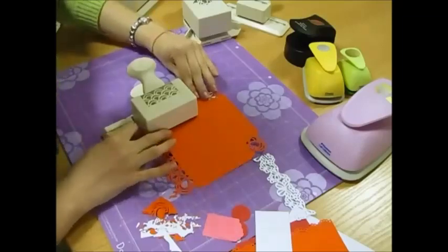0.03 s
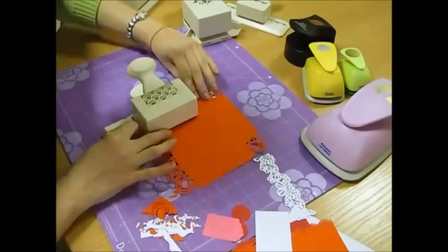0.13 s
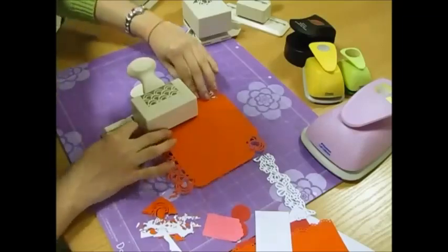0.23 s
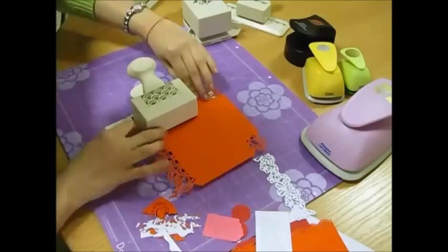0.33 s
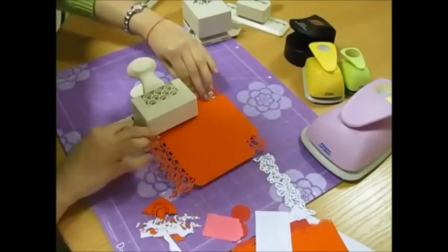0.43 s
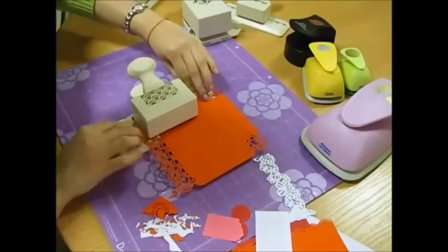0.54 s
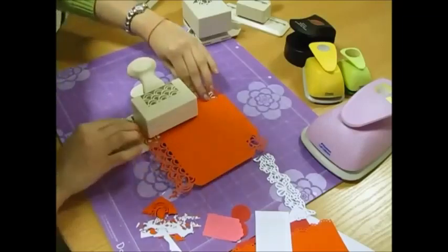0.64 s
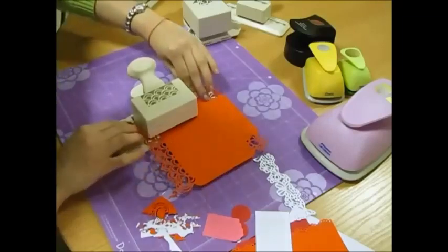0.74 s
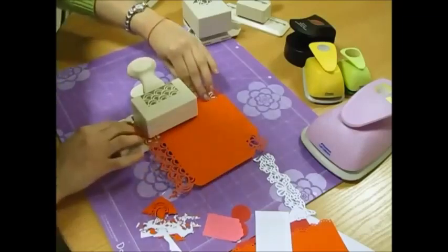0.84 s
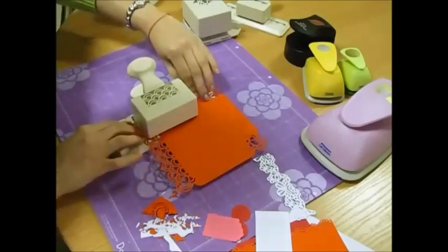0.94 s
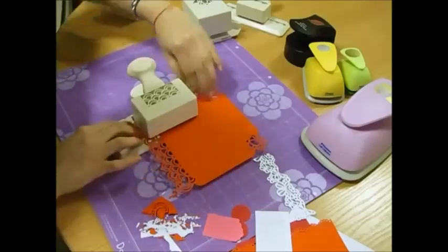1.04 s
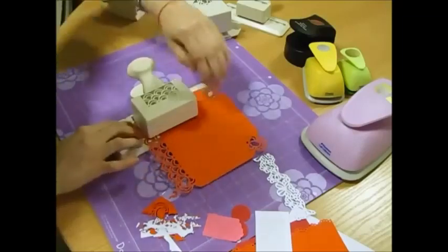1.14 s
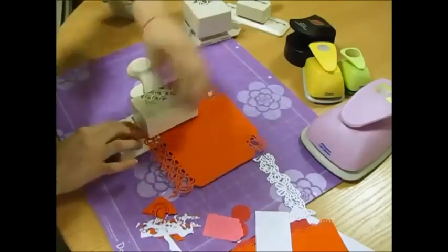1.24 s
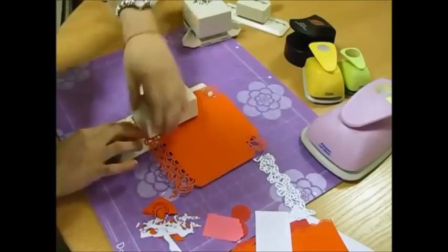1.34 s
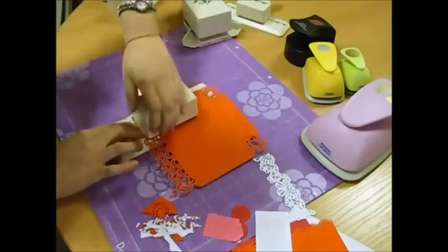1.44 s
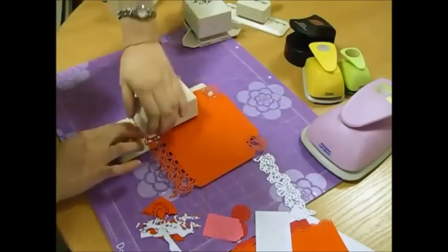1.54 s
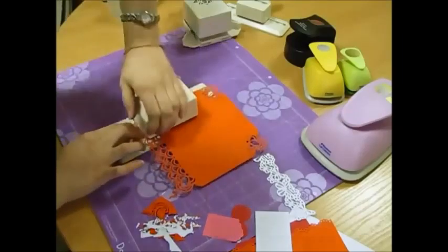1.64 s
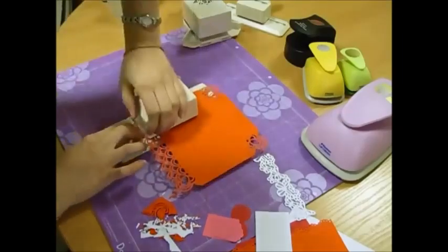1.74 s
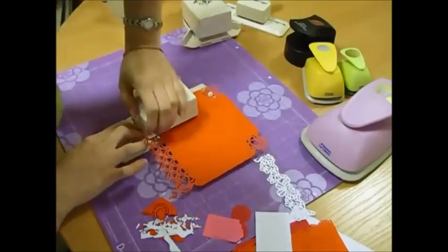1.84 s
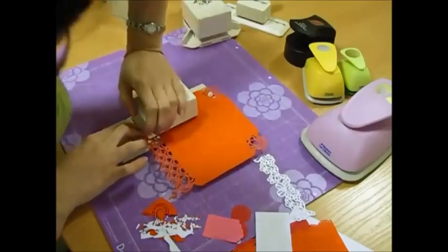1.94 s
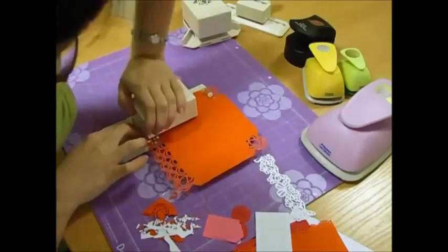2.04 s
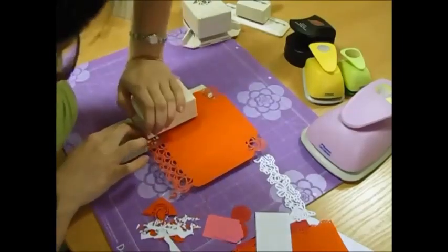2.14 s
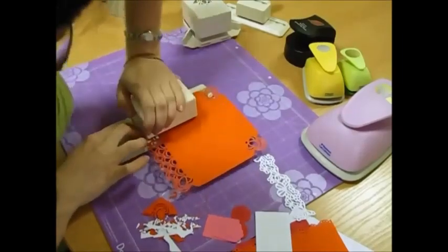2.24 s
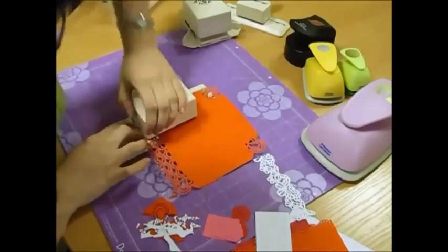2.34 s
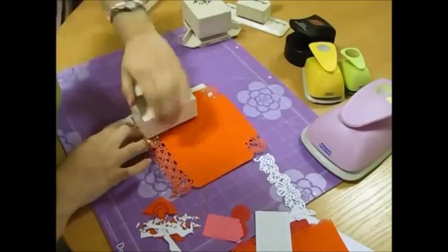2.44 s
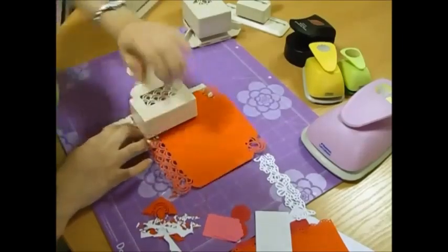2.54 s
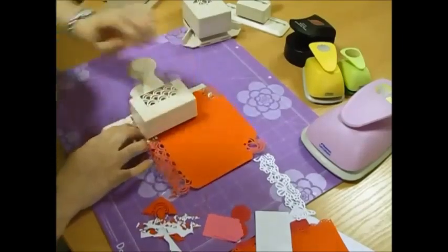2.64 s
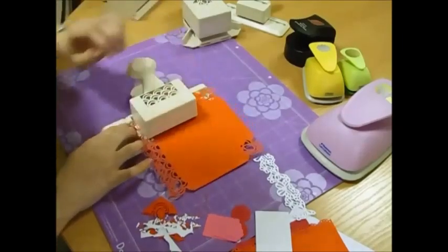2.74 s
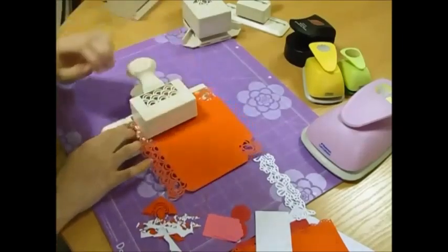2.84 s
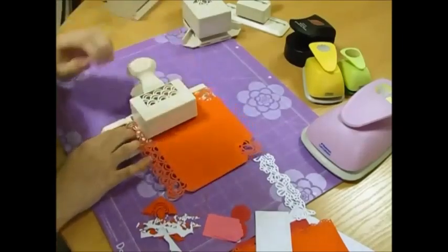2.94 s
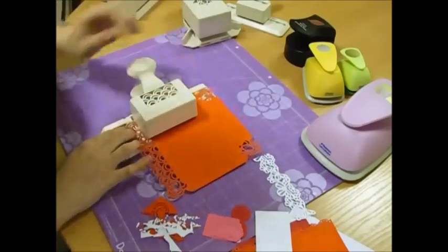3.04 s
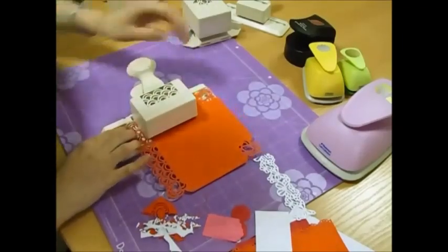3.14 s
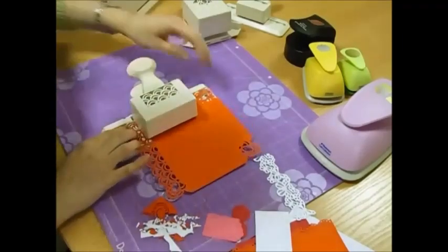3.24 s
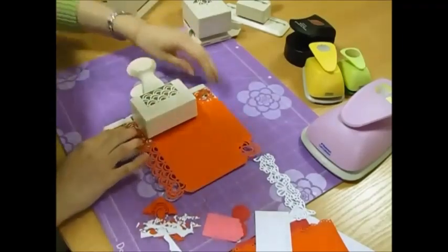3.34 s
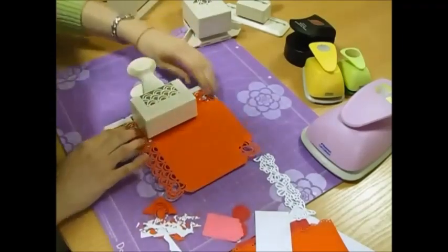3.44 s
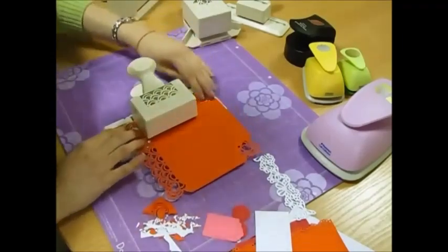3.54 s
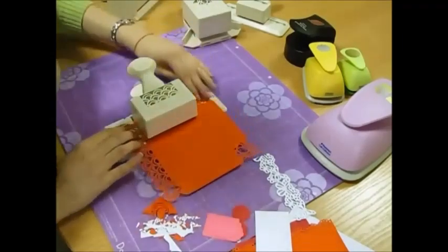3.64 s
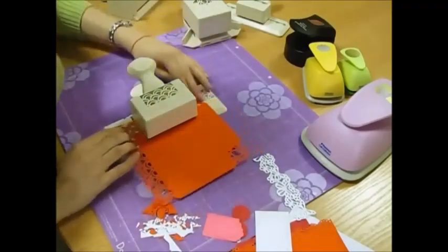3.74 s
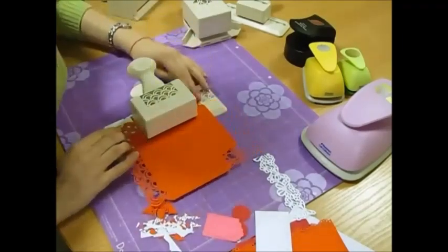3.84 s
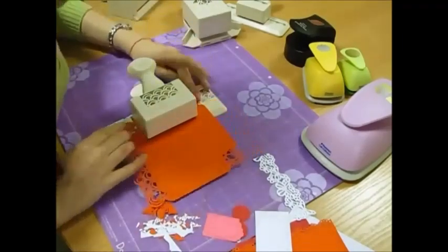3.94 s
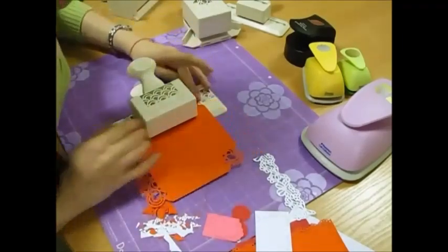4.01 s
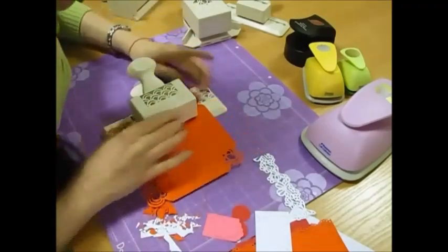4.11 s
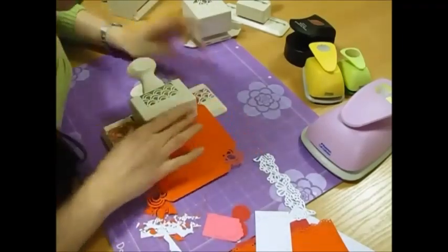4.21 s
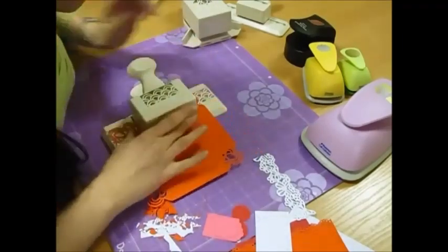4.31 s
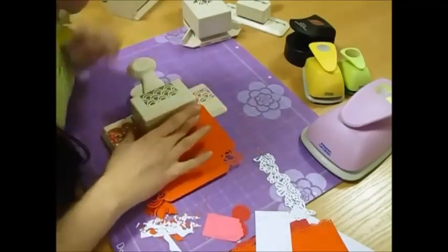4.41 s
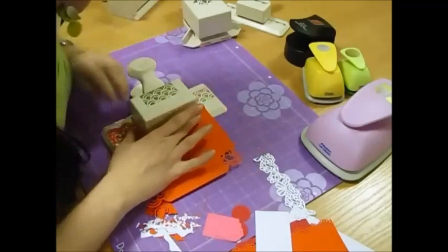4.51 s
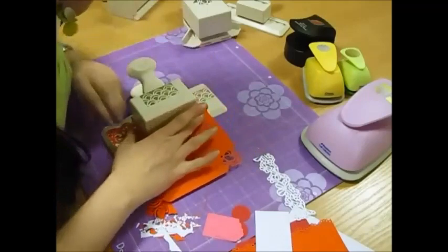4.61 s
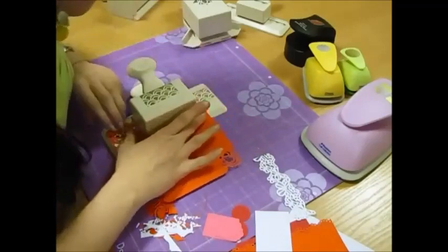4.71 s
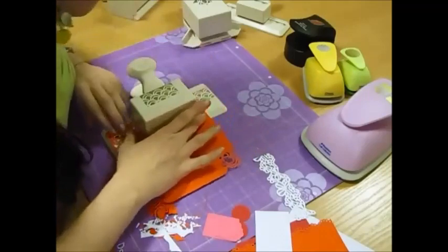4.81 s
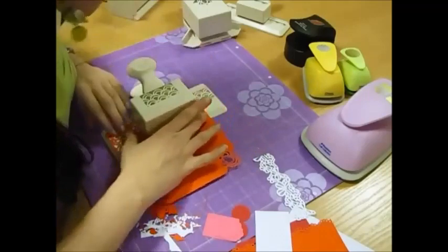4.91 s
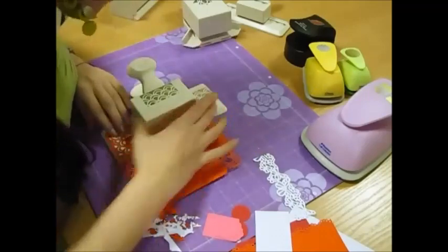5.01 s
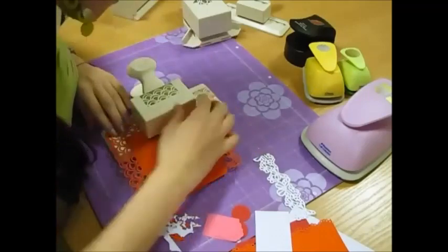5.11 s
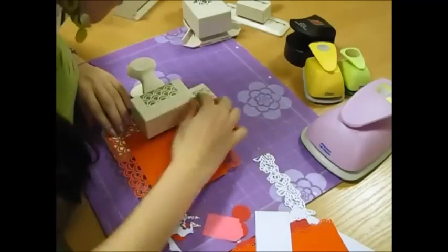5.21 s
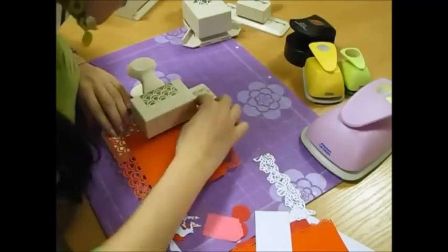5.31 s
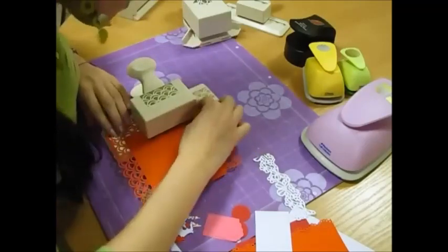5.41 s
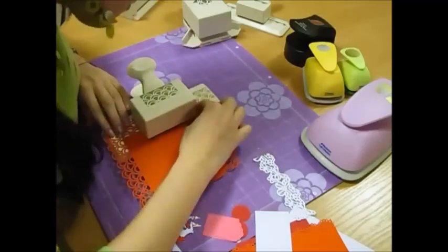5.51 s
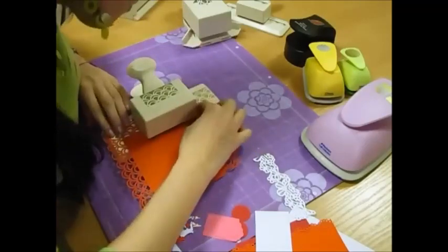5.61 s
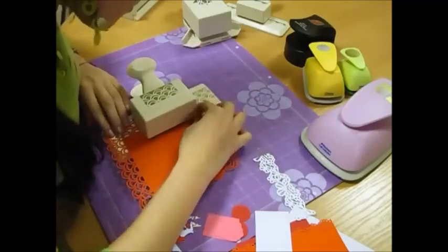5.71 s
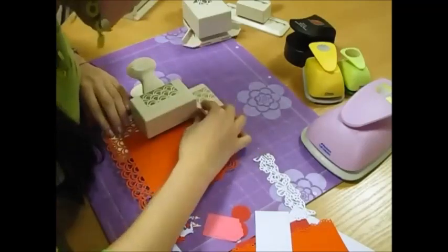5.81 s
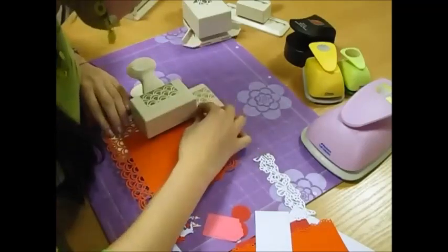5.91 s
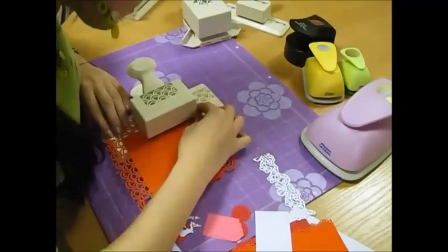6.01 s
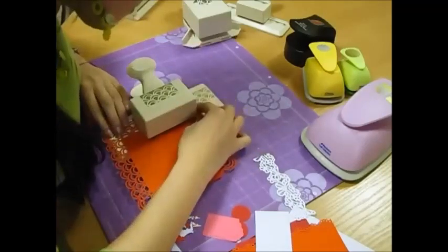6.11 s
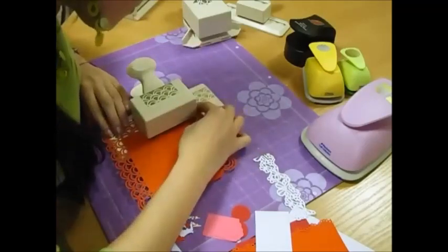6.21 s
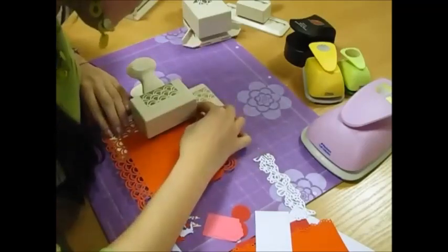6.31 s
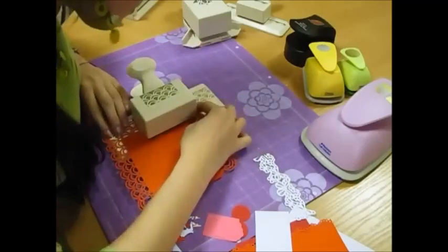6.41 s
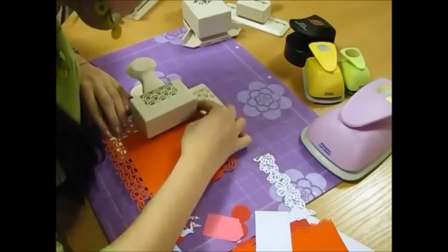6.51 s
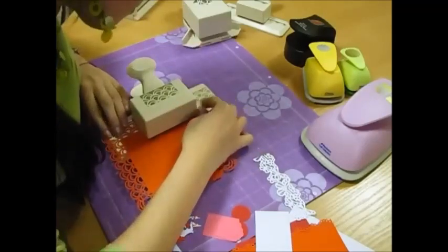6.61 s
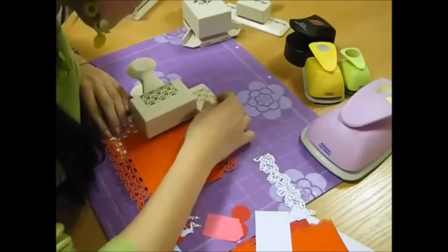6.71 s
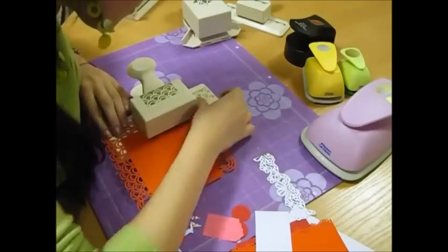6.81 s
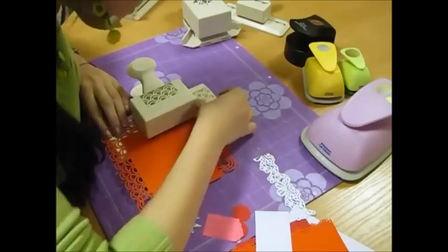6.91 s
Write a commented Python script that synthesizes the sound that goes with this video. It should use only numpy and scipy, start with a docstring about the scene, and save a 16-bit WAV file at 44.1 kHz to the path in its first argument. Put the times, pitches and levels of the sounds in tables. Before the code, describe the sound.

In a small rumbling room, a lever punch bites through card with one dense crunch, followed by a handle clack, papery slides and light clicks.

```python
"""A lever paper punch is pressed through card on a table, in a small room with a low rumble. Fracture bursts
and damped modes make the die break through in separate snaps, then in one dense crunch; noise grains scrape it
back up, the latch clicks as the die frees, and the handle rings as it knocks home twice. Before, but mostly
afterwards, the card is slid along the mat, patted and lined up: grains of friction noise, with small ticks of
fingers and card on the plastic as short clicks and rings."""
import sys
import numpy as np
from scipy import signal
from scipy.fft import rfft, irfft, next_fast_len
from scipy.io import wavfile
from scipy.ndimage import uniform_filter1d

SR = 44100
rng = np.random.default_rng(int(sys.argv[2]) if len(sys.argv) > 2 else 0)


def wrap_up_sound(samples):
    """Save the sound to the file named by the first command line argument, as 16-bit audio."""
    columns = np.atleast_2d(samples).T
    # keep every value between -1 and 1, then stretch to whole-number steps
    tamed = np.clip(columns, -1, 1)
    steps = np.round(tamed * 32767).astype(np.int16)
    wavfile.write(sys.argv[1], SR, steps)


N = 306495
T = np.arange(N) / SR
RING_T = T[:SR // 2]

# the die breaks through, levels before the trims of each layer: (time [s], crack [dB], treble of the crack [dB],
# thud of the base [dB], knock of the shell [dB], ring of the die [Hz], its upper ring [dB])
DIE_SNAPS = [(1.5619, -39.5, -80, -32, -35.5, 2220, -63.5), (1.7082, -51, -65, -31.5, -34.5, 2170, -59),
             (1.7487, -32, -40, -20.5, -32, 2130, -54), (1.793, -26, -38.5, -12, -17, 2480, -29.5),
             (1.834, -18.5, -24, -24.5, -22.5, 2070, -36), (1.8932, -16, -23, -10.5, -12.5, 2230, -30.5),
             (1.965, -23, -32.5, -18.5, -17.5, 2090, -36.5), (2.0035, -29.5, -27, -24, -15.5, 2550, -29),
             (2.0116, -14.5, -20.5, -11, -4, 2400, -25), (2.0227, -15.5, -32, -19.5, -24.5, 2360, -20.5),
             (2.0296, -13.5, -16.5, -15.5, -12.5, 2500, -9.5), (2.0356, -11, -24, -16, -10.5, 2155, -24),
             (2.0531, -17, -30, -23, -13, 2270, -25), (2.0868, -27, -34, -31, -29, 2620, -22),
             (2.098, -12, -40, -16.5, -45, 2510, -22), (2.1223, -22, -37, -46, -50, 2830, -29)]
# modes of the punch's base, before each blow's change of pitch: (frequency [Hz], relative level [dB], t60 [s])
BASE_MODES = [(78, -12, 0.073), (108, -6, 0.045), (285, 0, 0.045), (342, 2, 0.035), (390, 5, 0.026),
              (558.4, -19, 0.24)]
# modes of the cutting edges, before any change of pitch: (frequency [Hz], relative level [dB], t60 [s])
BLADE_MODES = [(5800, 4.5, 0.011), (6600, 1.5, 0.0087), (7760, -8, 0.018), (8480, 2.5, 0.0087)]
# modes of the hollow plastic body around the slot: (frequency [Hz], relative level [dB], t60 [s])
PLASTIC_MODES = [(1180, -3, .035), (1530, -8, .04), (2080, 0, .028), (2510, -3, .028), (3100, -1, .022),
                 (3560, -4, .018), (4230, -1, .02), (5600, -6, .016), (6400, -7, .016), (7000, -8, .016)]
# spectrum of breaking card: (frequency [Hz], level [dB])
CRACK_SPECTRUM = [(400, -3.5), (850, 0), (1020, -1.5), (1200, 0.5), (1800, -5), (2400, -0.5), (3200, -8.5),
                  (4000, -4), (4900, -12), (8600, -12), (10500, -16.5), (15000, -22)]
# spectrum of a light click: (frequency [Hz], level [dB])
TICK_SPECTRUM = [(300, 2), (800, 7.5), (1250, 10), (2600, 4.5), (3700, 7), (5000, 0.5), (7500, -19),
                 (15000, -20)]
# spectrum of the card's friction hiss: (frequency [Hz], level [dB])
CARD_SPECTRUM = [(590, -38), (1000, -13), (1700, -3), (2400, -0.5), (4240, -2.5), (7360, -11),
                 (8840, -15.5), (14300, -24.5), (15500, -43)]
# stereo width of sounds on the table: (frequency [Hz], side minus mid [dB])
NEAR_WIDTH = [(60, -51), (400, -15.5), (2000, -10), (4000, -8), (15000, -5)]
# the die rises through the cut card
LIFT_S, LIFT_ATTACK_S, LIFT_HOLD_S, LIFT_RELEASE_S = 2.335, 0.09, 0.067, 0.0046


def amp(db):
    """Decibels to an amplitude ratio."""
    return 10 ** (np.asarray(db) / 20)


def unit(x):
    """Normalization to an rms of 1."""
    return x / np.sqrt(np.mean(x ** 2) + 1e-20)


def read(points, hz):
    """Interpolation of a spectrum along logarithmic frequency."""
    f, value = np.transpose(points)
    return np.interp(np.log(hz + 1), np.log(f + 1), value)


def add(mix, s, sound):
    """Superposition: a sound is added in place from time s."""
    part = mix[..., round(s * SR):][..., :sound.shape[-1]]
    part += sound[..., :part.shape[-1]]


def convolve(x, response):
    """Linear filtering of each channel by an impulse response, keeping the length."""
    return signal.fftconvolve(np.atleast_2d(x), np.atleast_2d(response), axes=1)[:, :x.shape[-1]]


def colour(x, points, size=2048):
    """Minimum-phase filtering: the Hilbert transform of the log gain gives a causal phase."""
    hz = abs(np.fft.fftfreq(size, 1 / SR))
    log_gain = np.log(amp(np.maximum(read(points, hz), -90)))
    response = np.fft.ifft(np.exp(np.conj(signal.hilbert(log_gain)))).real
    return convolve(x, response)


def passed(x, points):
    """Spectral shaping that keeps the power of a white drive."""
    gains = amp(read(points, np.linspace(0, SR / 2, SR // 10)))
    return colour(x, points) / np.sqrt(np.mean(gains ** 2))


def ring(modes, pitch=1, rise_s=0.0022):
    """Modal decay: damped sines of a struck body, neighbours in opposite phase, with a joint peak of 1."""
    wave = np.zeros(len(RING_T))
    for k, (hz, db, t60) in enumerate(modes):
        decay = amp(db - 60 * RING_T / t60)
        wave += (-1) ** k * decay * np.sin(2 * np.pi * hz * pitch * RING_T)
    wave = wave * (1 - np.exp(-RING_T / rise_s))
    return wave / abs(wave).max()


def struck(x, modes):
    """Modal resonance by convolution, keeping the power of a white drive."""
    wave = ring(modes)
    return convolve(x, wave / np.linalg.norm(wave))


def resonate(x, hz, width):
    """Heterodyne resonance of gain 1: shift the moving centre to zero, low-pass, shift back."""
    turn = np.exp(2j * np.pi * np.cumsum(hz) / SR)
    r = np.exp(-np.pi * width / SR)
    lowered = signal.lfilter([1 - r], [1, -r], x / turn + 1e-18)
    return 2 * (turn * lowered).real


def ports(pair, side_db=NEAR_WIDTH):
    """Spatial coherence: mid and side noise give two microphones a frequency-dependent likeness."""
    share = amp(read(side_db, np.fft.rfftfreq(pair.shape[1], 1 / SR)))
    mid, side = rfft(pair)
    left_right = np.array([mid + share * side, mid - share * side]) / np.hypot(1, share)
    return irfft(left_right, pair.shape[1])


def noise(side_db=NEAR_WIDTH):
    """White noise with partial coherence between two microphones."""
    return ports(rng.standard_normal((2, next_fast_len(N))), side_db)[:, :N]


def grains(per_s, spread_db, grain_s=0.0002):
    """Stick-slip friction: random slips of uneven size, each a decaying puff of noise."""
    happens = rng.random
    size = amp(spread_db * np.minimum(rng.exponential(1, N), 3.5)) * (happens(N) < per_s / SR)
    power = signal.lfilter([1], [1, -np.exp(-2 / (grain_s * SR))], size ** 2 + 1e-20)
    return unit(ports(rng.standard_normal((2, N)) * np.sqrt(power)))


def burst(points, decay_s, edges=(6000,), size=2048):
    """Brittle fracture: swelling and dying noise, split into bands with a smoothed peak of 1 each."""
    age = T[:size] / decay_s
    spectra = rfft(rng.standard_normal((2, size)) * age * np.exp(-age))
    evened = irfft(spectra / (abs(spectra) + 1e-9) ** (2 / 3))  # flattens the chance peaks of the spectrum
    crack = colour(ports(evened), points)
    bands = []
    for limits in zip((100, *edges), (*edges, 18000)):
        band = signal.sosfilt(signal.butter(4, limits, "band", fs=SR, output="sos"), crack)
        peak_power = uniform_filter1d(band.mean(0) ** 2, size=88).max()
        bands.append(band / np.sqrt(peak_power))
    return bands


def envelope(s, attack_s, hold_s, release_s, power=1.14):
    """Amplitude envelope: attack, hold and release from time s, bent by a power."""
    return np.interp(T, s + np.cumsum([0, attack_s, hold_s, release_s]), [0, 1, 1, 0]) ** power


def lingering(times, dbs, decay_s):
    """Relaxation: energy arrives at each of the times and decays exponentially."""
    kicks = np.zeros(N)
    kicks[np.round(times * SR).astype(int)] = amp(dbs) ** 2
    return np.sqrt(signal.lfilter([1], [1, -np.exp(-2 / (decay_s * SR))], kicks + 1e-20))


def wander(rate_hz):
    """Low-pass random fluctuation with an rms of 1."""
    return unit(signal.lfilter(*signal.butter(2, rate_hz, fs=SR), rng.standard_normal(N)))


def wavering(hz, depth=0.032, rate_hz=16):
    """Random frequency modulation of a resonance; depth is its relative rms."""
    return hz * (1 + depth * wander(rate_hz))


def punch(spring_db=-25):
    """Coupled excitation: snaps and tearing fibres drive the spring, while the base judders on the mat."""
    cracks, blows = snaps()
    cracks = cracks + tearing()
    return cracks + blows + amp(spring_db) * spring(cracks) + judder()


def snaps(crack_db=-4, thud_db=-0.75, knock_db=-1, treble_db=-4, die_db=-3, die_t60=0.016,
          upper_hz=3950, upper_t60=0.01, blade_db=2, decay_s=0.0009, lag_s=0.00045):
    """Sudden release of stored force: each fracture cracks, then kicks die, shell, base and cutting edges."""
    # modes of the shell, before each blow's change of pitch: (frequency [Hz], relative level [dB], t60 [s])
    shell_modes = [(744, 7.5, 0.012), (868, 1.5, 0.03), (1213, -17.5, 0.03), (1278, -7.5, 0.019),
                   (1586, -16.5, 0.018)]
    # small bridges of card split without moving the die: (time [s], level [dB])
    bridge_splits = [(1.8028, -38), (1.8508, -37), (1.983, -32), (2.0685, -37), (2.0798, -32),
                     (2.1013, -28.5)]
    cracks, blows = np.zeros((2, N)), np.zeros(N)
    for s, crack, treble, thud, knock, die_hz, upper_db in DIE_SNAPS:
        body, top = burst(CRACK_SPECTRUM, decay_s)
        add(cracks, s, amp(crack + crack_db) * body + amp(treble + treble_db) * top)
        pitch = rng.uniform(.96, 1.04)
        kick_s = s + lag_s
        add(blows, kick_s, amp(thud + thud_db) * ring(BASE_MODES, pitch))
        add(blows, kick_s, amp(knock + knock_db) * ring(shell_modes, pitch))
        add(blows, kick_s, amp(crack + die_db) * ring([(die_hz, 0, die_t60)]))
        add(blows, kick_s, amp(upper_db) * ring([(upper_hz, 0, upper_t60)], pitch, rise_s=0.00063))
        add(blows, kick_s, amp(treble + blade_db) * ring(BLADE_MODES, np.sqrt(pitch), rise_s=0.0004))
    for s, db in bridge_splits:
        add(cracks, s, amp(db) * sum(burst(CRACK_SPECTRUM, decay_s)))
    return cracks, blows


def load(break_s=1.865, load_db_per_s=69, slack_db_per_s=198):
    """Loading and failure: the hand's force builds exponentially until the card gives way, then drops."""
    return amp(np.minimum((T - break_s) * load_db_per_s, (break_s - T) * slack_db_per_s))


def tearing(strain_db=-44, after_snap_db=-18.0, after_snap_s=0.035, dull_hz=8500,
            crunch_db=-22.5, clump_db=1.0, clump_hz=200):
    """Fibre failure as grains: dull creaks under load and after each snap, then bright clumps in the crunch."""
    times, crack_db = np.transpose(DIE_SNAPS)[:2]
    strain = amp(strain_db) * load() + amp(after_snap_db) * lingering(times, crack_db, after_snap_s)
    # the bulk of the pattern tears in one swell
    swell = envelope(1.948, attack_s=0.067, hold_s=0, release_s=0.084, power=1.8)
    fibres = grains(per_s=1800, spread_db=1.8) * unit(amp(clump_db * wander(clump_hz)))
    dulling = signal.butter(2, dull_hz, fs=SR, output="sos")
    creak = signal.sosfiltfilt(dulling, fibres * strain)
    return passed(creak + fibres * amp(crunch_db) * swell, CRACK_SPECTRUM)


def spring(x, held_db=-12, scatter=0.068, drop_s=2.2):
    """Sympathetic resonance of close modes, driven more freely once the dropping die frees the spring."""
    # centres of the return spring's mode clusters: (frequency [Hz], relative level [dB], t60 [s])
    clusters = [(2280, -1, 0.08), (2560, -14, 0.21), (4350, -8.5, 1)]
    modes = []
    for hz, db, t60 in clusters:
        for u in rng.uniform(-0.91, 1, size=30):
            modes.append((hz * (1 + scatter * u), db, t60))
    return struck(x * np.where(T > drop_s, 1, amp(held_db)), modes)


def judder(load_db=-39, after_snap_db=-26, after_snap_s=0.11, lift_db=-40, bump_db=-2):
    """Stick-slip of the base on the mat under load, after thuds and in the lift, with modal knocks as it rocks."""
    # the base rocks on the mat: (time [s], level before the bump trim [dB])
    bumps = [(1.636, -35.5), (2.17, -22.5), (2.368, -29.5), (2.419, -29)]
    # spectrum of the judder: (frequency [Hz], level [dB])
    groan = [(30, -13), (80, -2.5), (170, -2), (320, 3), (480, -2), (660, -14), (850, -14), (1100, -25),
             (2000, -36)]
    times, _, _, thud_db, *_ = np.transpose(DIE_SNAPS)
    strength = amp(load_db) * load() + amp(after_snap_db) * lingering(times, thud_db, after_snap_s)
    lift = envelope(LIFT_S, LIFT_ATTACK_S, LIFT_HOLD_S, LIFT_RELEASE_S, power=1.0)
    strength = strength + amp(lift_db) * lift
    out = passed(grains(per_s=400, spread_db=0) * strength, groan)
    for s, db in bumps:
        add(out, s, amp(db + bump_db) * ring(BASE_MODES, rng.uniform(.85, 1.1)))
    return out


def rise(scrape_db=-40, squeal_db=-25, squeal_width=260, clump_db=2, clump_hz=110):
    """Friction-driven resonance: the die grates up in uneven slips and its resonance sinks as it comes free."""
    # spectrum of the scrape: (frequency [Hz], level [dB])
    scrape = [(400, -22), (850, 5.5), (1100, -6), (1700, -3), (2500, -3.5), (3600, -2.5), (5000, -1.5),
              (8000, -7.5), (10500, -7.5), (15000, -22)]
    # mean resonance of the rising die, about which it wavers: (time [s], frequency [Hz])
    squeal = [(2.36, 2740), (2.465, 2240), (2.49, 2110)]
    slips = grains(per_s=1800, spread_db=0) * unit(amp(clump_db * wander(clump_hz)))
    slips = slips * envelope(LIFT_S, LIFT_ATTACK_S, LIFT_HOLD_S, LIFT_RELEASE_S)
    centre = wavering(np.interp(T, *np.transpose(squeal)))
    return amp(scrape_db) * passed(slips, scrape) + amp(squeal_db) * resonate(slips, centre, squeal_width)


def handle(click_db=-11, rattle_db=-15, rattle_s=0.032):
    """Impact excitation: the plastic handle meets its stop twice, rattles in its seat and bumps the table."""
    # the handle comes home: (time [s], level [dB], ring [Hz], bump through the table [dB])
    stops = [(2.4796, -19, 1040, -22), (2.543, -24.5, 1397, -40)]
    # modes of the handle: (multiple of the ring [1], relative level [dB], t60 [s])
    handle_modes = [(.83, 2.5, 0.031), (1.0, -7, 0.023), (1.12, -0.5, 0.056), (1.27, -5, .016)]
    # modes of the table: (frequency [Hz], relative level [dB], t60 [s])
    table_modes = [(101.3, -9, 0.48), (135.6, 5.5, 0.07), (212, -4.5, 0.23), (318, 8.5, 0.044),
                   (463, -1, 0.16)]
    # spectrum of the rattle in the seat: (frequency [Hz], level [dB])
    seat = [(400, 2.5), (1000, 1), (1500, 4), (1900, -16), (9000, -30)]
    out = np.zeros((2, N))
    for s, db, hz, bump_db in stops:
        add(out, s, amp(db) * ring(handle_modes, hz) + amp(bump_db) * ring(table_modes))
        add(out, s, amp(db + click_db) * burst(TICK_SPECTRUM, decay_s=0.00095)[0])
    times, dbs = np.transpose(stops)[:2]
    rattle = grains(per_s=960, spread_db=-7) * lingering(times, dbs, rattle_s)
    return out + amp(rattle_db) * passed(rattle, seat)


def leaned(pair):
    """Directivity: each band of the punch tips towards the left or the right microphone."""
    # uneven radiation of the punch: (frequency [Hz], left minus right [dB])
    lean = [(1200, 0), (2300, -3), (3300, -2), (5000, 0.5)]
    size = next_fast_len(N)
    half_db = read(lean, np.fft.rfftfreq(size, 1 / SR)) / 2
    return irfft(rfft(pair, size) * amp([half_db, -half_db]), size)[:, :N]


def push(s, length, speed_up=0.22, slow_down=0.29):
    """Kinematics of one push: the card speeds up, moves on and slows down, in shares of its length."""
    return envelope(s, speed_up * length, (1 - speed_up - slow_down) * length, slow_down * length)


def slides(sheet_db=7, sheet_hz=2090, sheet_width_hz=96, pat_hiss_db=-4, fidget_hiss_db=-71,
           fidget_rub_db=-66, fidget_swing_db=2, fidget_hz=4, catch_db=1.74, catch_hz=70):
    """Stick-slip friction: card fibres catch on the mat in clumps; the hands rub duller and never quite rest."""
    # the card is pushed along the mat: (time [s], length [s], hiss of the card [dB], rub of hand and mat [dB])
    pushes = [(1.048, 0.053, -55, -60), (2.683, 0.11, -51, -57), (3.503, 0.15, -53, -56),
              (3.606, 0.35, -47.5, -57), (4.296, 0.062, -55, -64), (4.377, 0.06, -53, -63),
              (4.467, 0.13, -58.5, -59), (4.782, 0.23, -58.5, -57), (5.49, 0.037, -48.5, -58),
              (5.96, 0.12, -61, -62), (6.543, 0.088, -56.5, -81)]
    # a hand lands on the card and brushes to rest: (time [s], length [s], level [dB])
    pats = [(3.922, 0.27, -55), (4.638, 0.14, -46.5), (5.382, 0.071, -55), (5.738, 0.069, -56.5)]
    # spectrum of the rub: (frequency [Hz], level [dB])
    rub_spectrum = [(200, -6.5), (450, 4), (800, 7.5), (1100, 6.5), (1700, -0.5), (2500, 0), (3300, -4.5),
                    (5000, -29.5)]
    fidget = unit(amp(fidget_swing_db * wander(fidget_hz)))
    face, palm = amp(fidget_hiss_db) * fidget, amp(fidget_rub_db) * fidget
    # unrelated noises add in power
    for s, length, hiss, rub in pushes:
        speed = push(s, length)
        face, palm = np.hypot(face, amp(hiss) * speed), np.hypot(palm, amp(rub) * speed)
    for s, length, db in pats:
        brush = amp(db) * envelope(s, attack_s=0.0027, hold_s=0, release_s=length)
        face, palm = np.hypot(face, amp(pat_hiss_db) * brush), np.hypot(palm, brush)
    catch = unit(amp(catch_db * wander(catch_hz)))
    slips = grains(per_s=9000, spread_db=2) * catch * face
    rubbing = passed(grains(per_s=2800, spread_db=-3.0) * catch * palm, rub_spectrum)
    # the card's own resonance drifts as it flexes
    sheet = resonate(slips, wavering(sheet_hz), sheet_width_hz)
    return passed(slips, CARD_SPECTRUM) + amp(sheet_db) * sheet + rubbing


def drags(hiss_db=-2):
    """Friction-driven resonance: the freed card hisses through the slot and rings the hollow plastic."""
    # the card drags through the slot of the punch: (time [s], length [s], level of the drive [dB])
    slot_drags = [(2.685, 0.12, -54), (2.826, 0.075, -54.5), (3.67, 0.25, -55.5)]
    strength = sum(amp(db) * push(s, length) for s, length, db in slot_drags)
    slips = grains(per_s=5000, spread_db=2) * strength
    return struck(slips, PLASTIC_MODES) + amp(hiss_db) * passed(slips, CARD_SPECTRUM)


def squeaks(width_hz=130):
    """Narrow-band resonance: the sliding card sings faintly at a gliding or steady pitch."""
    # (time [s], length [s], first pitch [Hz], last pitch [Hz], level [dB])
    songs = [(3.37, 0.12, 3850, 4300, -67), (3.693, 0.082, 5650, 5650, -53), (3.975, 0.13, 4430, 4850, -69),
             (4.873, 0.079, 2560, 2580, -53)]
    out = np.zeros((2, N))
    for s, length, first_hz, last_hz, db in songs:
        centre = np.interp(T, [s, s + length], [first_hz, last_hz])
        tone = resonate(resonate(noise(), centre, width_hz), centre, width_hz)
        out += amp(db) * unit(tone) * envelope(s, length / 2, 0, length / 2)
    return out


def ticks(body_db=-13.5, treble_db=-5, top_db=-13, ring_db=-7, upper_db=-1, low_t60=0.017,
          upper_t60=0.015, blade_db=0, body_ring_db=-13):
    """Light impacts: a dry click, two short rings set by the spot touched, and tails of edges and plastic body."""
    # fingers and card edges tick on the plastic, and the latch clicks twice as the die frees, levels before the
    # trims of each layer: (time [s], level [dB], lower ring [Hz], upper ring [Hz], treble [dB])
    contacts = [(0.039, -39, 870, 1460, -78), (0.711, -45, 2080, 4960, -53.5), (2.331, -31, 920, 5800, -40),
                (2.339, -34, 850, 6600, -36), (2.405, -34, 2440, 5350, -29.5),
                (3.27, -44.5, 2600, 3560, -62), (3.937, -31, 690, 2110, -62),
                (4.313, -35.5, 2150, 3400, -66), (4.324, -32.5, 2100, 3540, -71),
                (4.584, -30.5, 4330, 4720, -44.5), (4.633, -25.5, 1750, 2320, -73),
                (5.379, -31, 1510, 3460, -45.5), (5.512, -34, 1590, 2800, -51),
                (5.705, -39.5, 810, 1500, -66), (6.042, -27, 1480, 2640, -43.5),
                (6.1595, -34, 2260, 2820, -66)]
    out = np.zeros((2, N))
    for s, db, low_hz, upper_hz, treble in contacts:
        low, high, highest = burst(TICK_SPECTRUM, decay_s=0.0013, edges=(6000, 9000))
        add(out, s, amp(db + body_db) * low)
        add(out, s, amp(treble + treble_db) * high + amp(treble + top_db) * highest)
        spot_modes = [(low_hz, 0, low_t60), (upper_hz, upper_db, upper_t60)]
        add(out, s, amp(db + ring_db) * ring(spot_modes) + amp(treble + blade_db) * ring(BLADE_MODES))
        add(out, s, amp(db + body_ring_db) * ring(PLASTIC_MODES))
    return out


def room(x, first_s=0.00095, dense_s=0.07):
    """Reverberation: reflections come sparsely, then crowd together, each band decaying at its own rate."""
    # reverberation time: (frequency [Hz], t60 [s])
    decay_times = [(80, 0.67), (250, 0.87), (800, 0.54), (2500, 0.51), (6000, 0.39), (14000, 0.21)]
    # colour of the reflections: (frequency [Hz], level [dB])
    soak = [(100, 7), (180, -0.5), (480, -1.5), (1100, -1), (3000, -2.5), (15000, -2.5)]
    chance = np.clip((T[:SR] / dense_s) ** 2, .01, 1)
    taps = rng.standard_normal((2, SR)) * (rng.random(SR) < chance) / np.sqrt(chance)
    taps = taps * np.clip(T[:SR] / first_s - 1, 0, 1)  # silent until first_s
    hz, t, z = signal.stft(taps, SR, nperseg=256)
    decay = amp(-60 * t / read(decay_times, hz)[:, None])
    tail = ports(signal.istft(z * decay, SR, nperseg=256)[1][:, :SR])
    return convolve(x, colour(tail / np.linalg.norm(tail[0]), soak))


def background(air_db=-50.5, rumble_side_db=-23):
    """Filtered noise: steady hiss over a rumble that gathers in the lowest resonances of the room."""
    # spectrum of the hiss: (frequency [Hz], level [dB])
    air = [(53, -23), (90, 0.5), (112, -0.5), (140, -6.5), (240, -10.5), (350, -14.5), (560, -18),
           (1960, -25), (3700, -29), (14200, -40.5), (15500, -71)]
    # stereo width of the hiss: (frequency [Hz], side minus mid [dB])
    far_width = [(150, -13), (380, -6), (950, -6), (2380, -0.5), (15000, 0)]
    # resonances, the first before its swell: (frequency [Hz], half-width [Hz], level [dB])
    rumble = [(37, 8, -49), (62.01, 0.48, -48), (97, 47, -63)]
    # gain of the deepest rumble: (time [s], level [dB])
    swell = [(3.6, -7), (4.3, -9.5), (5.1, 5.5), (5.35, -3), (5.65, 4.5), (6, -6)]
    out = amp(air_db) * unit(colour(noise(far_width), air))
    hz = np.fft.rfftfreq(N, 1 / SR)
    for k, (centre, width, db) in enumerate(rumble):
        spectrum = rfft(noise([(centre, rumble_side_db)])) / (1 + ((hz - centre) / width) ** 2)
        drone = amp(db) * unit(irfft(spectrum, N))
        if k == 0:
            drone = drone * amp(np.interp(T, *np.transpose(swell)))
        out += drone
    return out


def scene(punch_wet_db=-7, card_wet_db=-6, left_db=0.15):
    """Superposition of punch and card on the table, their reflections and the background."""
    tool = leaned(punch() + rise() + handle())
    card = ticks() + slides() + drags() + squeaks()
    reflections = room(amp(punch_wet_db) * tool + amp(card_wet_db) * card)
    mix = tool + card + reflections + background()
    return mix * amp([[left_db], [-left_db]])


def record(dry):
    """Clipping and band limit: the loudest peaks are capped, then a linear-phase low-pass at 15.3 kHz follows."""
    low_pass = signal.firwin(255, 15300, window=("kaiser", 9), fs=SR)
    return signal.oaconvolve(np.clip(dry, -.92, .92), low_pass[None], "same")


dry = scene()
out = record(dry)
wrap_up_sound(out)
```